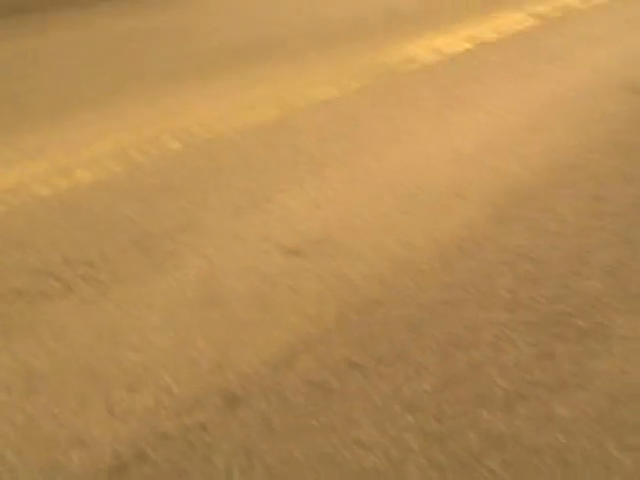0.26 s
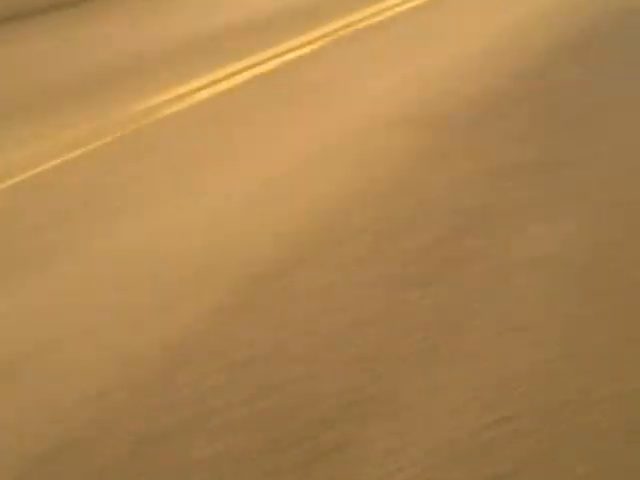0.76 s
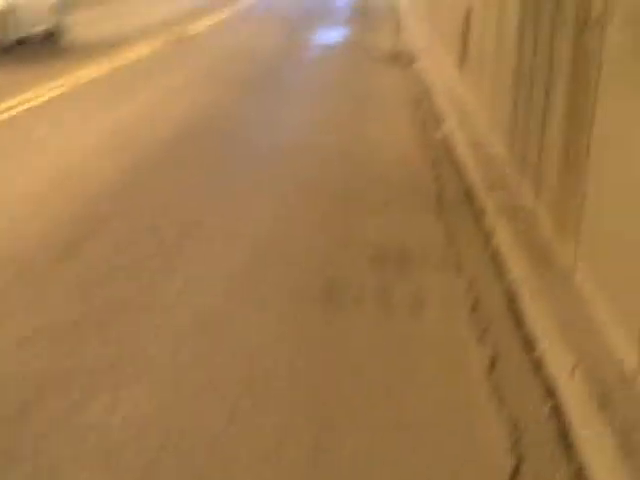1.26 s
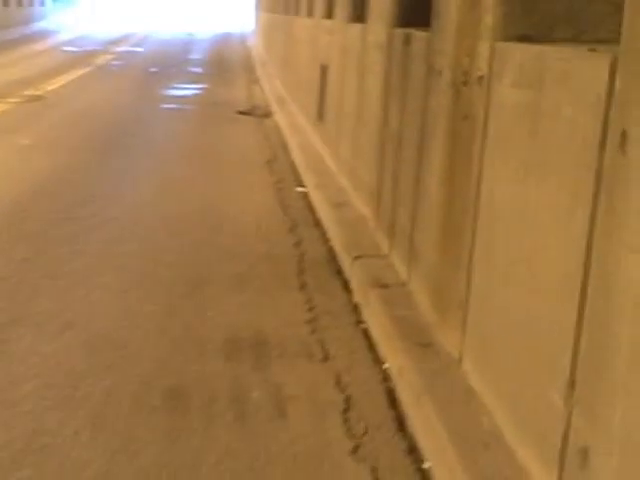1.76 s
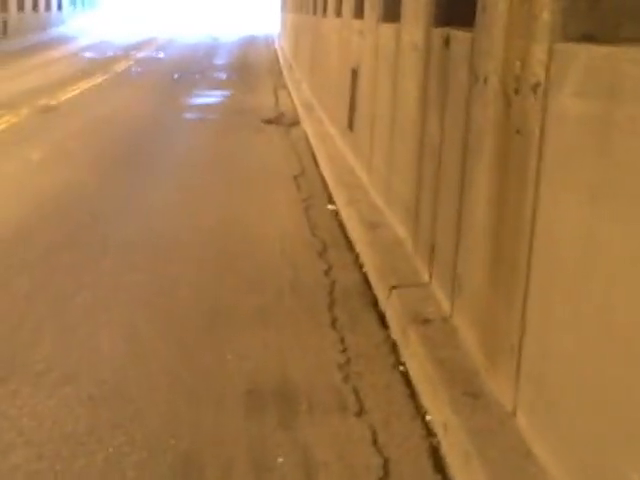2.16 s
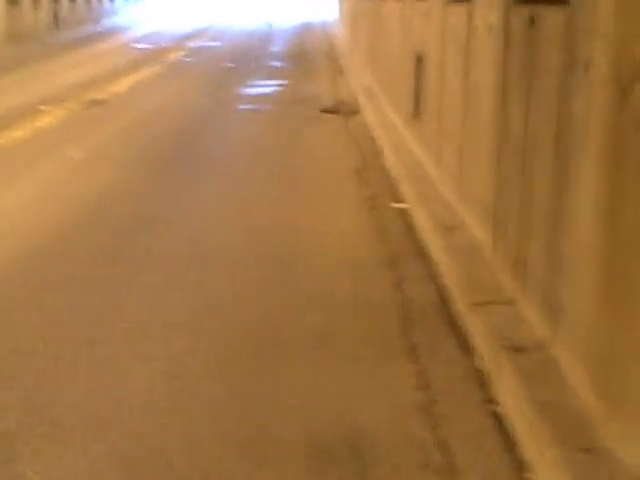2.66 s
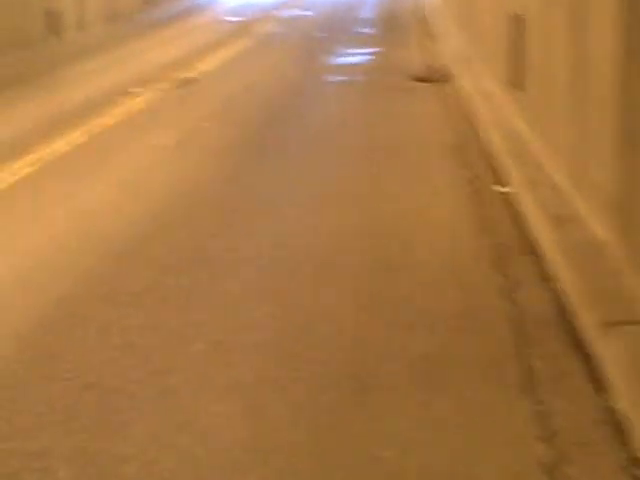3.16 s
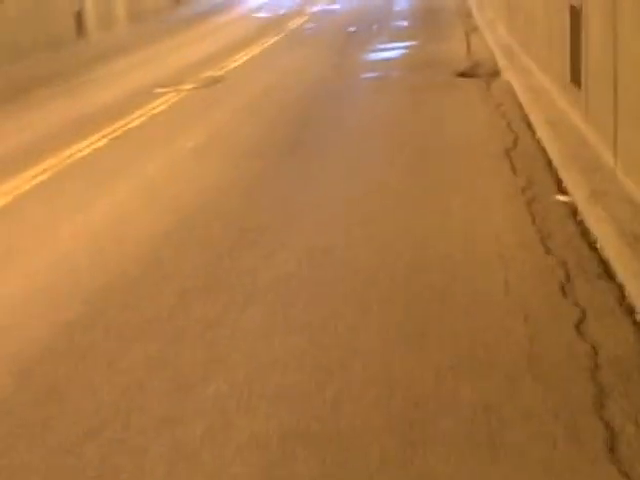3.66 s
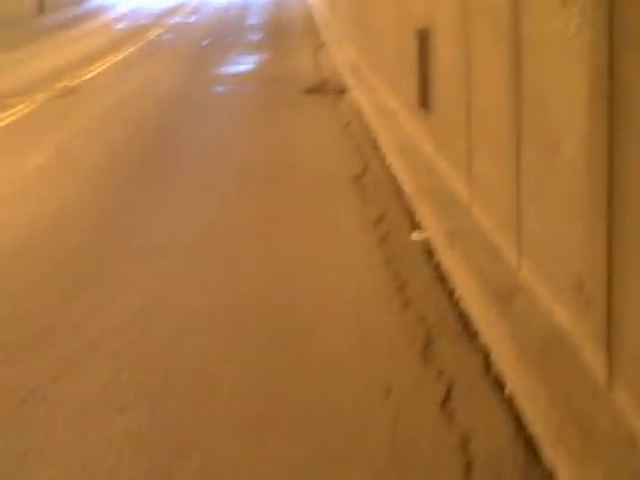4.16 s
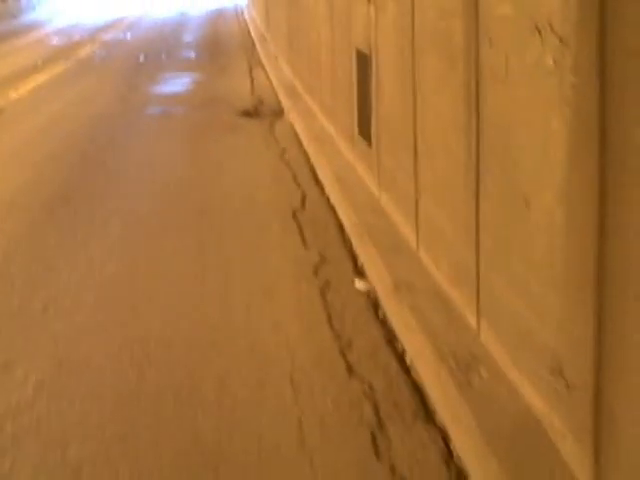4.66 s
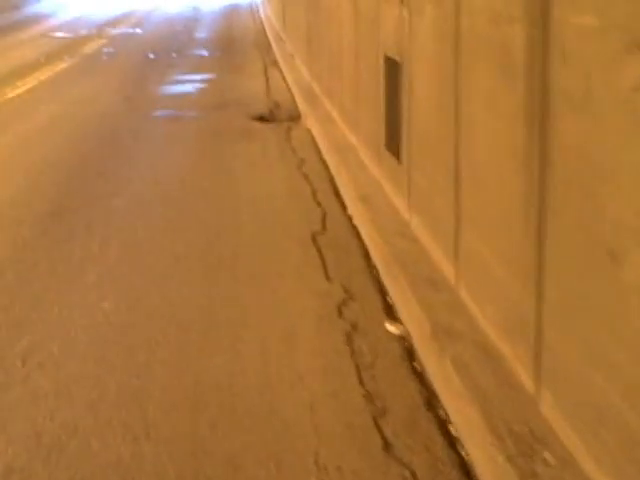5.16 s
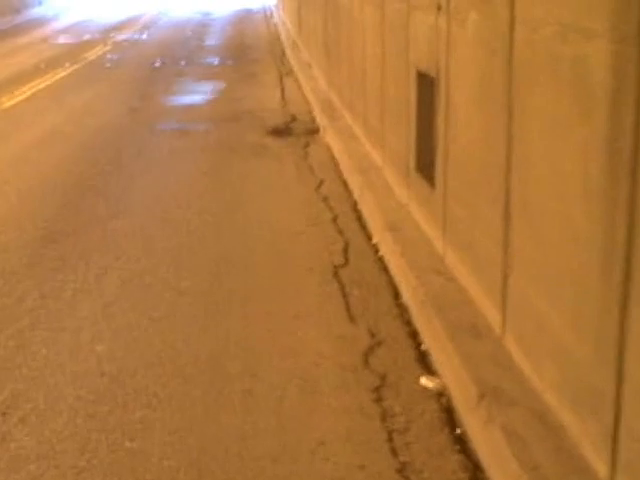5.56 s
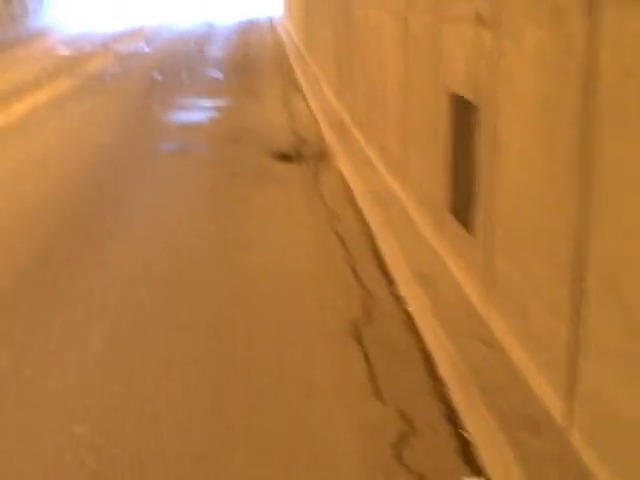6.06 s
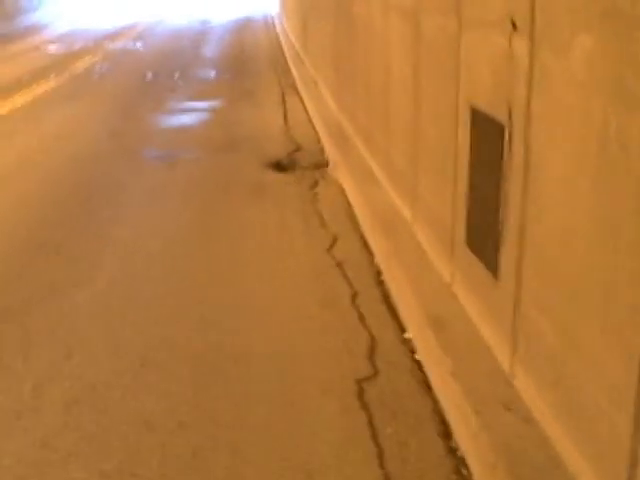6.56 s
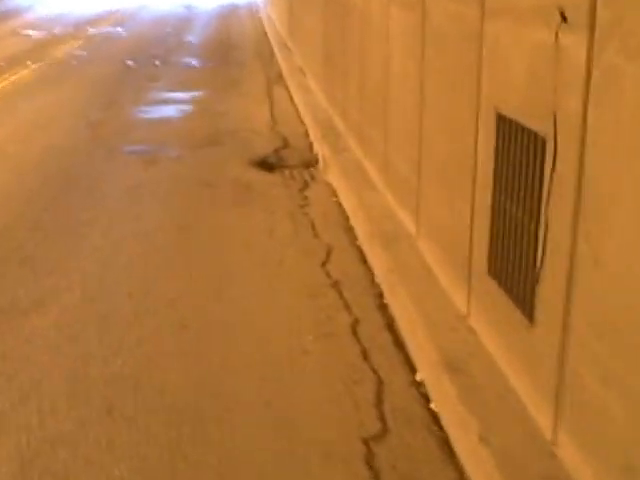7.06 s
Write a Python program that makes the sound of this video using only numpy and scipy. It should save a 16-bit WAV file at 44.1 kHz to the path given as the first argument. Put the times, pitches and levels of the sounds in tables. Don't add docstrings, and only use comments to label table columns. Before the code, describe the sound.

Dense tyre rush and low engine drone fill a concrete road tunnel, swelling near two seconds, then easing, with occasional tiny grit ticks.

```python
import sys
import numpy as np
from scipy import signal
from scipy.fft import rfft, irfft, next_fast_len
from scipy.io import wavfile
from scipy.ndimage import uniform_filter1d

SR = 44100
rng = np.random.default_rng(int(sys.argv[2]) if len(sys.argv) > 2 else 0)


def invert_db(x):
    u = np.asarray(x, float) / 20
    return 10 ** u


def int16_out(signal):
    q = np.round(np.clip(np.atleast_2d(signal).T, -1, 1) * 32767)
    wavfile.write(sys.argv[1], SR, q.astype(np.int16))


N = 321840
T = np.arange(N) / SR
HZ = np.fft.rfftfreq(next_fast_len(N), 1 / SR)


def unit(x):
    return x / np.sqrt(np.mean(x ** 2))


def shape(x, gain):
    size = next_fast_len(N)
    return irfft(rfft(x, size) * gain, size)[:N]


def colour(points):
    hz, db = np.transpose(points)
    gain = invert_db(np.interp(np.log(HZ + 1), np.log(hz), db))
    return gain * (HZ > hz[0]) * (HZ < hz[-1])


def walk(rate):
    hold = int(SR / rate)
    steps = np.repeat(rng.standard_normal(N // hold + 1), hold)
    slewed = uniform_filter1d(uniform_filter1d(steps, hold), hold)
    return unit(slewed[:N])


def hump(start_s, length_s):
    return np.sin(np.pi * np.clip((T - start_s) / length_s, 0, 1))


def noise_band(gain):
    return unit(shape(rng.standard_normal(N), gain))


def noisy_resonance(phase, lowpass):
    a = shape(rng.standard_normal(N), lowpass)
    b = shape(rng.standard_normal(N), lowpass)
    return unit(a * np.cos(phase) + b * np.sin(phase))


def rush(points, lo_hz, hi_hz, drift_db, flicker_db, shared_db, count):
    octave = np.log2(HZ + 1)
    centres = np.linspace(np.log2(points[0][0]), np.log2(points[-1][0]), count)
    spacing = centres[1] - centres[0]
    shoulders = 1 / np.sqrt((1 + (lo_hz / (HZ + 1)) ** 10) * (1 + (HZ / hi_hz) ** 10))
    spectrum = shoulders * colour(points)
    together_db = shared_db * walk(rate=40)
    out = np.zeros(N)
    for centre in centres:
        band = np.cos(np.pi / 2 * np.clip((octave - centre) / spacing, -1, 1))
        noise = shape(rng.standard_normal(N), band * spectrum)
        out += noise * invert_db(drift_db * walk(rate=2.13) + flicker_db * walk(rate=12) + together_db)
    return unit(out)


# time in seconds, tunnel fill in dB, nearness of the closest tyres in dB.
TRAFFIC = [(0, -1, -1), (.3, .5, .5), (.8, 1.5, 3), (1.35, 2, 5), (1.75, 3.5, 7.5), (2.05, 4, 6.5),
           (2.23, 3.5, 5.5), (2.35, 3, 2.5), (3.0, 1.5, -0.5), (3.6, -0.4, -2), (4.2, -1, -3.5),
           (4.93, -3, -1), (5.15, -3, -3.5), (5.9, -3.5, -4), (6.25, -1, -2.5), (6.75, -1.5, -2),
           (7.0, 0.5, -1.5), (7.3, 0.5, 0)]
# level in dB, share of fill, share of nearness,
# loss in dB per second as the first queue pulls away.
LAYERS = dict(rumble=(-21, 0.49, 0.2, 0.04), roar=(-27, 1.2, -0.11, -0.11), horn=(-26.5, 0.83, 0.09, 0.13),
          shelf=(-28.5, 1, -0.15, 0.31), whine=(-30.5, 0.12, 0.6744, 0.38), hiss=(-35, 0.23, 1.0551, 0))


def layer(name, lag_s=0):
    s, fill_db, near_db = np.transpose(TRAFFIC)
    level_db, fill, near, loss_db_per_s = LAYERS[name]
    fill_now_db = fill * np.interp(T - lag_s, s, fill_db)
    near_now_db = near * np.interp(T, s, near_db)
    return invert_db(level_db + fill_now_db + near_now_db - loss_db_per_s * T)


# time in seconds, peak in dB, lowest frequency in Hz.
TICKS = [(3.1040, -18, 3400), (3.1058, -19.5, 3200), (3.1080, -24, 3400), (3.1790, -20.5, 3800),
         (3.1815, -19.5, 3600), (3.1840, -29, 5000), (5.4025, -20, 5400), (5.4050, -29, 5400),
         (5.4400, -33, 5400), (5.6675, -22, 2600), (5.6700, -25, 3000), (5.6728, -24.5, 3400),
         (5.6750, -27, 4000), (5.6800, -28, 5000), (6.4150, -26, 3000), (6.4172, -20.5, 3000),
         (6.4202, -25, 3400), (6.4490, -29, 5500), (7.2895, -23, 5200), (7.2950, -21, 5200)]
# frequency in Hz, density in dB per Hz.
TICK_COLOUR = [(1500, 0), (4000, 1), (4900, -3), (6300, 0), (7200, -9), (7900, -20), (8050, -26)]


def grit():
    out = np.zeros(N)
    for start_s, peak_db, lo_hz in TICKS:
        tail = invert_db(-9) * (T > start_s) * np.exp(-np.abs(T - start_s) / 0.0012)
        burst = rng.standard_normal(N) * tail
        burst[int(start_s * SR)] += 1
        tick = shape(burst, colour(TICK_COLOUR) / (1 + (lo_hz / (HZ + 1)) ** 8))
        out += invert_db(peak_db) * tick / np.abs(tick).max()
    return out


# start in seconds, length in seconds, centre in Hz, level in dB.
SCUFFS = [
    (6.15, .12, 6400, -40.5),
    (6.05, .3, 7300, -54),
    (4.78, .16, 5800, -46),
    (2.02, .25, 6200, -39),
    (6.09, .04, 6300, -43),
    (5.69, .05, 6300, -45),
]


def scuffs():
    out = np.zeros(N)
    for start_s, length_s, hz, db in SCUFFS:
        out += invert_db(db) * hump(start_s, length_s) * noise_band(1 / (1 + ((HZ - hz) / 500) ** 4))
    return out


# peak time in seconds, length in seconds, frequency in Hz, level in dB.
DRONE = [(.02, .34, 39.4, -20.5), (0.33, .2, 41.28, -20.5), (0.598, 0.35, 42.42, -16.5),
         (0.972, .3, 39.84, -25.5), (1.19, .18, 40.9, -21), (1.45, 0.39, 41.2, -20.5),
         (1.828, 0.51, 41.15, -20), (2.148, 0.42, 40.33, -36), (2.532, .35, 39.5, -24),
         (2.957, .3, 39.77, -17.5), (3.098, 0.1, 39.1, -20), (3.366, 0.36, 38.26, -18.5),
         (3.884, 0.34, 38.53, -24), (4.124, 0.19, 38.93, -18.5), (4.57, 0.13, 38.63, -26),
         (4.848, 0.28, 41.04, -30), (5.08, .15, 42.3, -27), (5.26, .15, 39.5, -29), (5.41, 0.16, 39.8, -30),
         (5.6, 0.14, 42.5, -32), (5.9, 0.45, 41.5, -35), (6.284, 0.1, 40, -26), (6.52, 0.3, 37.9, -25),
         (6.793, 0.092, 42.1, -31), (6.95, 0.31, 42.5, -27), (7.274, 0.22, 40.7, -22.5)]


def drone():
    peak_s, _, hz, _ = np.transpose(DRONE)
    level = invert_db(-39.5)
    for centre_s, length_s, _, db in DRONE:
        level = level + invert_db(db - 3.5) * hump(centre_s - length_s / 2, length_s)
    return np.sqrt(2) * level * np.sin(2 * np.pi * np.cumsum(np.interp(T, peak_s, hz)) / SR)


# start in seconds, length in seconds, frequency in Hz, level in dB.
NOTES = [(0.145, 0.11, 240, -19.5), (0.54, 0.2, 180, -22.5), (0.602, 0.18, 148, -24),
         (0.68, 0.12, 223, -24), (1.244, 0.12, 248, -20.5), (1.287, 0.11, 137, -20.5),
         (1.33, 0.15, 253, -21), (1.44, 0.27, 65, -28.5), (1.525, 0.26, 250, -24.5), (1.65, 0.29, 137, -24),
         (1.7, 0.25, 70, -23), (1.93, 0.16, 192, -16.5), (1.984, 0.25, 127, -23.5), (1.99, 0.31, 250, -25),
         (2.003, 0.17, 229, -23), (2.09, 0.14, 191, -16.5), (2.25, 0.2, 202, -23.5),
         (2.318, 0.13, 108, -23.5), (2.51, 0.13, 135, -20.5), (2.69, 0.24, 132, -25.5),
         (2.788, 0.38, 65, -28), (2.815, 0.12, 215, -29), (3.14, 0.13, 226, -28), (3.28, 0.15, 67, -23),
         (3.545, 0.12, 250, -28), (3.582, 0.19, 145, -21.5), (3.84, 0.11, 231, -23),
         (3.96, 0.13, 183, -18.5), (3.99, 0.11, 264, -28), (4.04, 0.29, 164, -27), (4.09, 0.16, 221, -28),
         (4.135, 0.18, 175, -22), (4.63, 0.19, 70, -20), (4.78, 0.2, 67, -20), (4.862, 0.16, 226, -21.5),
         (5.167, 0.14, 81, -25.5), (5.602, 0.23, 215, -26), (5.71, 0.31, 240, -28), (5.76, 0.1, 266, -28.5),
         (5.99, 0.14, 261, -24), (6.23, 0.13, 51, -19.5), (6.333, 0.23, 231, -25), (6.34, 0.097, 137, -31),
         (6.53, 0.31, 234, -28.5), (6.73, 0.13, 140, -25.5), (6.88, 0.17, 140, -28),
         (7.012, 0.22, 160, -19.5), (7.193, 0.06, 199, -25.5), (2.4, 0.17, 308, -21),
         (4.85, 0.17, 63, -21.5)]


def exhausts():
    wavering_s = np.cumsum(1 + 0.01002 * walk(rate=12)) / SR
    out = np.zeros(N)
    for start_s, length_s, hz, db in NOTES:
        out += invert_db(db - 1.5) * hump(start_s, length_s) * np.sin(2 * np.pi * hz * wavering_s)
    return out


# start in seconds, length in seconds, centre in Hz, level in dB.
CARS = [(6.5, 1.4, 800, -30.5), (6.0, 0.9, 603, -35), (4.5, 0.87, 630, -34.5), (2.5, 0.73, 1220, -33),
        (3, 0.77, 1290, -37.5), (1.1, 0.6, 820, -33), (0.4, 1.2, 820, -35.5), (0.3, 0.82, 980, -34.5),
        (1.4, 0.65, 1300, -32), (-.4, 0.79, 930, -32.5), (7.5, 1.3, 930, -36), (4, 1.07, 1370, -40),
        (1, 0.8, 245, -26.5), (1.4, 1.05, 490, -32), (0.7, .7, 1440, -36), (6.2, 0.48, 129, -28.5),
        (3.5, 0.72, 80, -28.5), (-1.5, 0.44, 65, -28), (0.3, .4, 195, -24.5), (1.7, 0.6, 197, -28),
        (5, 0.74, 92, -32), (3, 0.32, 65, -28), (5, 0.33, 75.6, -31), (6.8, 0.64, 610, -31),
        (3.5, 0.68, 510, -34), (4.5, 0.52, 430, -34), (1.5, .5, 1900, -45), (6, 0.8, 1330, -38),
        (0.5, 0.79, 5900, -40), (1.3, 0.97, 5600, -42), (2.45, 0.58, 5900, -42), (5, 0.36, 3900, -46.5),
        (7, .7, 6300, -38.5), (1.5, .75, 6500, -38), (2.25, .45, 540, -32), (6, .9, 4500, -47),
        (.6, .4, 300, -32.5)]


def cars():
    half_width = 0.077
    out = np.zeros(N)
    for start_s, length_s, hz, db in CARS:
        band = 1 / (1 + ((HZ / hz - 1) / half_width) ** 4)
        out += invert_db(db) * hump(start_s, length_s) * noise_band(band)
    return out


# start in seconds, length in seconds, first and last centre in Hz, level in dB.
SLIDES = [
    (1.55, 1.15, 794.5, 1326, -29),
    (6.1, 1.4, 780, 900, -30.5),
]


def slides():
    width_hz = 230
    out = np.zeros(N)
    for start_s, length_s, from_hz, to_hz, db in SLIDES:
        hz = np.interp(T, [start_s, start_s + length_s], [from_hz, to_hz])
        phase = 2 * np.pi * np.cumsum(hz) / SR
        band = noisy_resonance(phase, 1 / (1 + (2 * HZ / width_hz) ** 4))
        out += invert_db(db) * hump(start_s, length_s) * band
    return out


# frequency in Hz, density in dB per Hz.
ROAR = [(260, -0.5), (330, -5), (430, -5.5), (520, -6.5), (610, -8.5), (700, -6), (850, -5.5), (1050, -6),
        (1300, -9), (1800, -16.5)]


def tyre_horn(width_hz, peak_db):
    broad = rush(ROAR[3:9], lo_hz=684, hi_hz=1040, drift_db=1.0, flicker_db=1.0, shared_db=0.0, count=3)
    shelf = rush(ROAR[6:], lo_hz=1044, hi_hz=1450, drift_db=0.9, flicker_db=-0.5, shared_db=0.0, count=3)
    horn_hz = 846.7 - 30.04 / (1 + np.exp((5.5 - T) / 0.2))
    phase = 2 * np.pi * np.cumsum(horn_hz) / SR
    peak = noisy_resonance(phase, 1 / (1 + (2 * HZ / width_hz) ** 2))
    horn = layer("horn") * unit(broad + invert_db(peak_db) * peak)
    return horn + layer("shelf", lag_s=0.2) * shelf


# frequency in Hz, density in dB per Hz.
RUMBLE = [(10, -11.5), (24, -13.5), (38, -6.5), (53, -8), (64, -2), (86, -7.5), (99, -3), (114, -6.5),
          (135, -3.5), (190, -4.5), (250, -5), (275, -7), (330, -8.5), (420, -12)]
WHINE = [(710, -30), (1200, -0.5), (2610, -12.5), (4200, -19), (5460, -49.5), (9240, -120)]
HISS = [(2800, 1), (3600, -2), (4750, -4), (5600, -2.5), (6250, 0.5), (6700, -2.5), (7200, -8), (7600, -12),
        (7900, -16), (8050, -17)]


def traffic():
    rumble = rush(RUMBLE, lo_hz=8, hi_hz=312, drift_db=-0.3, flicker_db=-0.06, shared_db=-0.44, count=8)
    roar = rush(ROAR[:7], lo_hz=333, hi_hz=702, drift_db=0.0, flicker_db=0.0, shared_db=-0.35, count=4)
    whine = rush(WHINE, lo_hz=1484, hi_hz=3500, drift_db=0.15, flicker_db=0.1, shared_db=0.5, count=4)
    hiss = rush(HISS, lo_hz=3430, hi_hz=12000, drift_db=-1.23, flicker_db=-0.25, shared_db=0.34, count=4)
    low = layer("rumble") * rumble + layer("roar") * roar
    return low + layer("whine") * whine + layer("hiss") * hiss


def scene():
    details = grit() + scuffs()
    engines = drone() + exhausts()
    single_cars = cars() + slides()
    return (details + engines + single_cars + tyre_horn(width_hz=310, peak_db=-3.0) + traffic())[None]


def low_pass(x):
    return signal.sosfilt(signal.butter(12, 10320, fs=SR, output="sos"), x)


# frequency in Hz, level in dB.
CAMERA_WHINE = [(7598, -67), (7656, -69), (7541, -71), (7403, -71)]
# frequency in Hz, gain in dB.
IMAGE = [(8000, -1.5), (8500, -7), (9000, -15), (9500, -24.5), (10000, -38), (10300, -45), (11000, -78)]


def record(dry):
    camera_rate_hz = 16000
    x = np.tanh(0.91 * dry[0]) / 0.89
    for hz, db in CAMERA_WHINE:
        x = x + np.sqrt(2) * invert_db(db) * np.sin(2 * np.pi * hz * T)
    x = shape(x, HZ < camera_rate_hz / 2)
    mirror = 2 * x * np.cos(2 * np.pi * camera_rate_hz * T)
    mix = x + shape(mirror, colour(IMAGE) * (HZ > camera_rate_hz / 2))
    return low_pass(mix[None])


dry = scene()
out = record(dry)
int16_out(out)
```